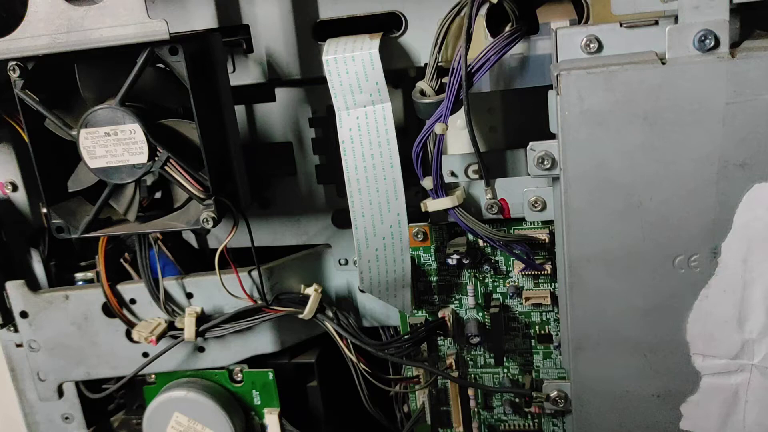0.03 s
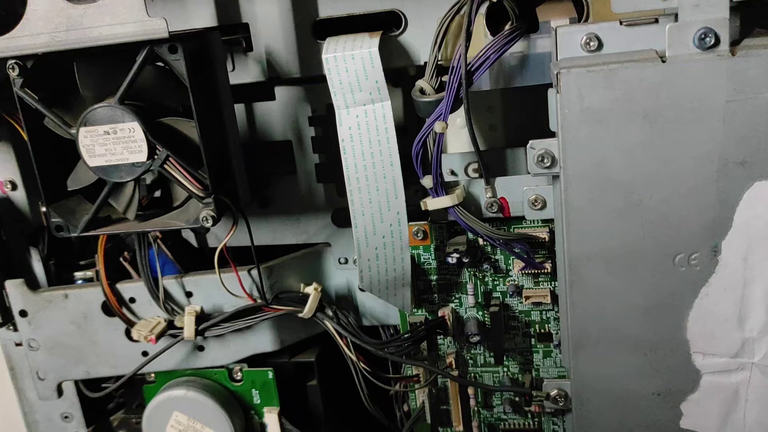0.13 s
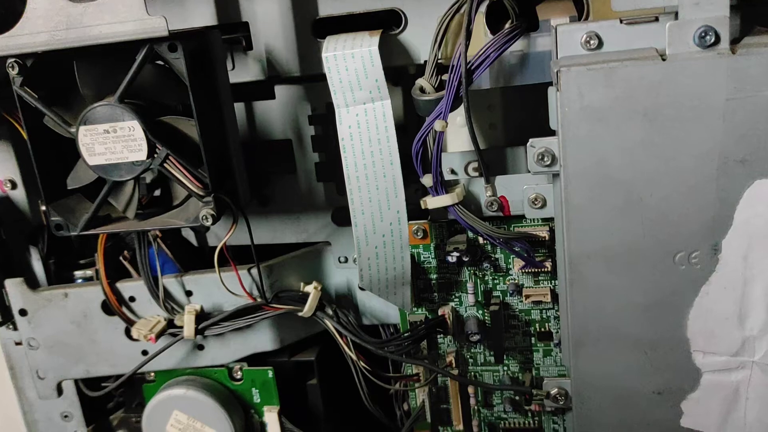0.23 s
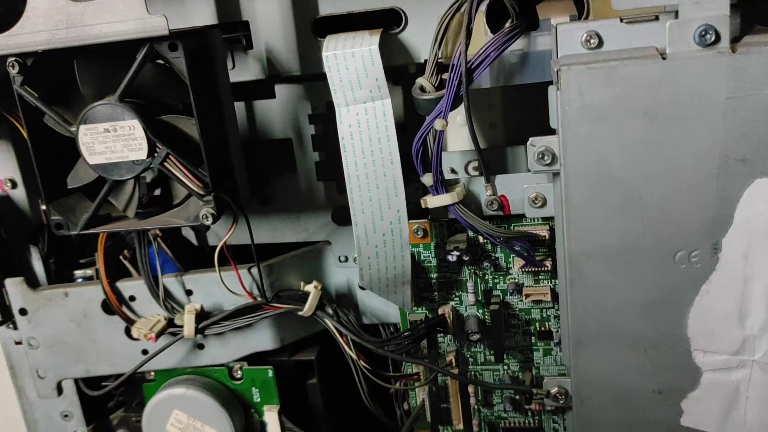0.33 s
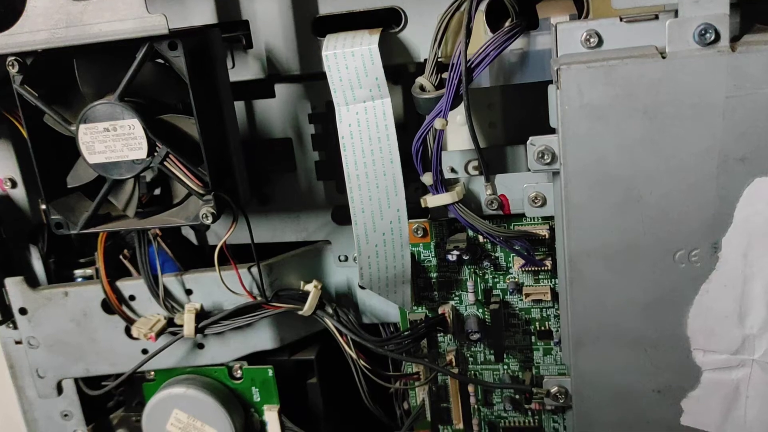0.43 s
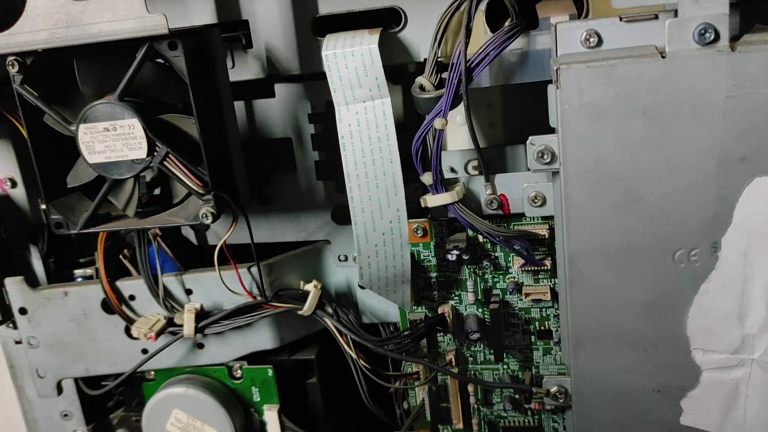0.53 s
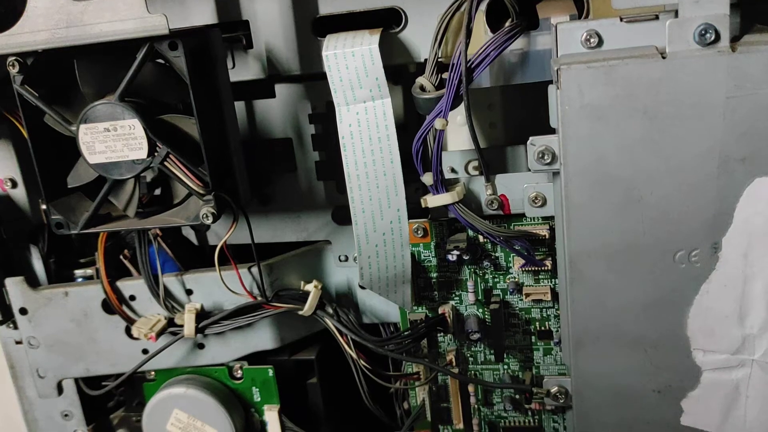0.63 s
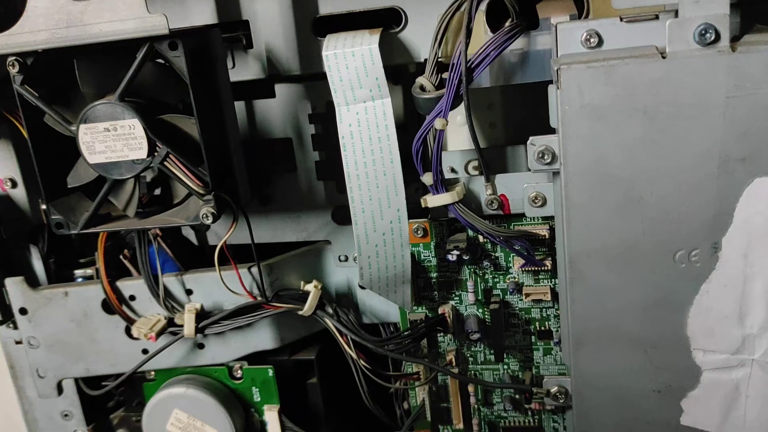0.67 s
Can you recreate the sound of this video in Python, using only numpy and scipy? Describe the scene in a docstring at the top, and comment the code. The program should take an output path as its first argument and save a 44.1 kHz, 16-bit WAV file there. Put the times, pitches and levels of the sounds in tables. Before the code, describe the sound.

A sharp, bright latch clack at about 0.5 seconds, several contacts in quick succession, rings thin sheet metal and a short room tail. Silence opens the first 0.1 seconds, then low fan hiss and faint scuffs. Small ticks and knocks scatter from 0.7 to 1.5. Around 1.7 to 1.9 a grainy, hissy slide along a panel swells and ends in soft low thumps. Close, uneven stereo, quiet indoors.

```python
"""Inside an open office machine in a quiet room, picked up close by two unlike microphone ports.
A fan lies low under the hiss: coloured noise. Parts scuff and tick, then something slides along a panel:
grainy noise bands. Small knocks and the thumps that end the slide are damped modes. Before the slide a latch
snaps with a sharp clack: noise bursts, a ringing sheet-metal frame and a room tail.
The recorder wakes up late and its offset swells, falls in steps and settles."""
import sys
import numpy as np
from scipy import signal
from scipy.fft import rfft, irfft, next_fast_len
from scipy.io import wavfile
from scipy.ndimage import uniform_filter1d, map_coordinates

SR = 44100
rng = np.random.default_rng(int(sys.argv[2]) if len(sys.argv) > 2 else 0)


def magnitude_from_level(level_db):
    """Linear magnitude for a level in decibels (20 dB per decade)."""
    exponent = np.asarray(level_db, float) / 20
    return 10 ** exponent


def int16_out(signal):
    """Quantize to a 16-bit WAV file."""
    q = np.round(np.clip(np.atleast_2d(signal).T, -1, 1) * 32767)
    wavfile.write(sys.argv[1], SR, q.astype(np.int16))


N = 94815

# Colour of fan, room and ports together. Each row: frequency in Hz, relative density in dB.
HISS_COLOUR = [(18, -28), (30, -16), (47, -18), (66, -22), (152, -25.5), (209, -26.5), (362, -32),
               (435, -34), (662, -44), (1090, -38.5), (1940, -39), (4730, -43), (6830, -34.5), (9860, -44),
               (11200, -39), (14600, -54.5), (15800, -44)]
# Balance of the hiss between the ports. Each row: frequency in Hz, left over right in dB.
HISS_BALANCE = [(100, 4.5), (400, 18.5), (1300, 11), (2500, 5), (4200, -3), (5500, 5), (6600, -21.5),
                (7600, 2), (8700, -12), (10000, 3), (11200, -3.5), (15000, -5.5)]
# Likeness of the two ports. Each row: frequency in Hz, left-right correlation from -1 to 1.
PORT_LIKENESS = [(60, 0.44), (180, 0.73), (550, 0.7), (1650, -0.39), (4970, -0.37), (15000, 0.34)]
# How long the room rings. Each row: frequency in Hz, t60 in seconds.
ROOM_DECAY = [(150, 0.95), (500, 0.9), (1200, 0.71), (2500, 0.57), (5000, 0.43), (8000, 0.37),
              (12000, 0.29)]

# Scuffs and ticks of parts. Each row: start in seconds, rise in seconds, t60 after the rise in seconds,
# treble level in dB, middle level in dB.
SCUFFS = [(0.183, 0.021, .15, -55.5, -62), (0.298, 0.037, 0.11, -58, -56.5), (0.452, 0.03, 0.23, -59, -61),
          (0.726, 0.0059, 0.15, -60, -68), (.766, 0.0087, 0.0834, -52, -59),
          (0.813, 0.0035, 0.11, -57, -58.5), (1.0829, 0.0011, .05, -55, -69.5),
          (1.124, 0.0013, 0.033, -50.5, -58), (1.139, 0.013, 0.17, -62, -67), (1.179, .003, 0.12, -78, -64),
          (1.313, 0.016, 0.12, -58, -62), (1.409, 0.0014, 0.0733, -55, -62),
          (1.43, 0.00184, 0.22, -63.5, -69), (1.477, 0.00255, 0.038, -59, -65),
          (1.491, 0.00093, 0.044, -53, -60.5), (1.507, 0.0021, 0.16, -65, -61),
          (1.791, 0.0022, 0.023, -53, -76), (2.068, 0.058, 0.163, -62, -62)]
# Course of the slide along the panel. Each row: time in seconds, treble, middle and panel level in dB.
SLIDE_COURSE = [(1.64, -76, -75.5, -71), (1.652, -72.5, -70.5, -65), (1.726, -52, -59.5, -54.5),
                (1.754, -49.5, -61, -56.5), (1.798, -42, -54.5, -53.5), (1.808, -46.5, -55, -57),
                (1.846, -41, -55, -48.5), (1.858, -45, -48.5, -47.5), (1.88, -51, -58, -59.5),
                (1.964, -69.5, -71, -73), (2.02, -73.5, -88, -68.5)]
# Colours of the four rubbing bands. Each row: frequency in Hz, relative density in dB.
TREBLE_COLOUR = [(2940, -73), (5000, -16), (5970, -6), (6740, -6), (7280, 2), (8250, 2), (9300, -4.5),
                 (10100, -26.5), (14000, -25.5), (15800, -44)]
MIDDLE_COLOUR = [(470, -12.5), (800, -6.5), (1150, -8.5), (1230, -19), (1350, -6.5), (1490, -6.5),
                 (1900, -6), (3500, -14.5), (4550, -65), (7700, -120)]
PANEL_COLOUR = [(35, -60), (60, -15), (136, -13.5), (204, -11.5), (317, -3), (389, -7), (436, -11),
                (522, -6.5), (694, -10.5), (900, -22.5), (1170, -69), (1980, -120)]
SQUEAK_COLOUR = [(2180, -24), (3700, -24), (3790, -1), (4050, 1.5), (5000, -9), (6500, -55), (11000, -120)]
# Balance of the rubbing. Each row: frequency in Hz, left over right in dB.
RUB_BALANCE = [(100, -8.5), (400, 2), (1300, 4), (2500, 13.5), (4200, -10.5), (5500, -18), (6600, -4),
               (7500, -14.5), (8700, 15), (10000, 8.5), (12000, 5), (15000, -5)]

# Small pitched knocks in the housing. Each row: time in seconds, centre frequency in Hz,
# relative level in dB, t60 in seconds.
KNOCKS = [(0.814, 1480, -58, 0.027), (0.826, 2580, -52, 0.031), (1.185, 880, -52.5, 0.018),
          (1.411, 2320, -38, 0.012), (1.511, 2037, -54, 0.0594)]
# Soft blows on the panel. Each row: time in seconds, level in dB.
THUMPS = [(1.80, -52), (1.826, -43), (1.840, -40), (1.854, -39)]
# Modes of the panel. Each row: frequency in Hz, level over the blow in dB, t60 in seconds.
PANEL_MODES = [(304, 0, .07), (335, -2, .07), (377, -2, .06), (503, -3, .06), (588, -10, .05)]

# Contacts of the latch. Each row: time in seconds, relative level in dB.
LATCH_CONTACTS = [(.4911, -29), (.4924, -23), (.4943, -28), (.4972, -31), (.4990, -33), (.5053, -34)]
# Colour of the contact noise. Each row: frequency in Hz, relative density in dB.
SNAP_COLOUR = [(120, -18.5), (200, -21), (334, -13), (393, -16), (774, -19), (929, -16.5), (1550, -15.5),
               (2360, -15.5), (3340, -22), (4010, -25), (7600, -14), (8960, -14), (10400, -33.5),
               (14200, -38.5), (15800, -71)]
# Balance of the contact noise. Each row: frequency in Hz, left over right in dB.
SNAP_BALANCE = [(300, 5), (1300, 5.5), (2600, 9), (4200, -3), (5500, -7.5), (6600, -11.5), (7500, -14.5),
                (8700, 9.5), (10000, 9), (12000, -2), (15000, 7)]
# Modes of latch and frame. Each row: nominal frequency in Hz, relative level in dB, t60 in seconds,
# left over right in dB.
FRAME_MODES = [(339, -18, 0.2, -2.5), (600, -13, 0.022, 1.5), (1150, -14.5, 0.038, 5),
               (1417, -19, 0.026, -6.5), (2680, -9, .015, 9), (3270, -15, .015, -6), (4500, -14, .012, -6),
               (7400, -1, .01, -8), (8650, 0, .009, 12), (12700, -18, 0.0053, 3),
               (14400, -28, 0.0085, 15.5)]

# Slow part of the recorder's offset. Each row: time in seconds, left, right as a part of full scale.
SLOW_OFFSET = [(.105, 0, 0), (.135, -.0015, .0004), (.15, .0066, .0035), (.166, .019, .0103),
               (.19, .0329, .0174), (.2258, .0519, .0271), (.2655, .0645, .0315), (.3255, .0767, .0342),
               (.36, .0755, .0328), (.4, .0653, .0272), (.45, .0554, .022), (.55, .0418, .0148),
               (.65, .0328, .0123), (.75, .0282, .0115), (.9, .0265, .0129), (1.1, .0282, .0141),
               (1.4, .028, .0155), (1.7, .0302, .0174), (2.15, .0325, .0179)]
# Sudden lasting falls of the offset. Each row: time in seconds, left, right as a part of full scale.
OFFSET_FALLS = [(.16605, .0052, .0028), (.22576, .0074, .0043), (.26549, .0105, .0049),
                (.32551, .0099, .0056)]


def unit(x):
    """Scaled to rms 1."""
    return x / np.sqrt(np.mean(x ** 2) + 1e-20)


def along(points, hz):
    """Values of a table of frequency points, joined by lines on a log frequency axis."""
    f, v = np.transpose(points)
    return np.interp(np.log(hz + 1), np.log(f + 1), v)


def curves(rows):
    """One value per sample for each column after the time."""
    seconds, *columns = np.transpose(rows)
    t = np.arange(N) / SR
    return np.array([np.interp(t, seconds, column) for column in columns])


def wobble(rate):
    """A smooth random curve through normal knots, rate knots a second."""
    knots = rng.standard_normal(int(N * rate / SR) + 4)
    return map_coordinates(knots, [np.arange(N) * rate / SR])


def filtered(x, response):
    """x with its spectrum multiplied by a response of frequency."""
    m = next_fast_len(N + SR // 2)
    return irfft(rfft(x, m) * response(np.fft.rfftfreq(m, 1 / SR)), m)[..., :N]


def ports(pair, colour, balance):
    """The two ports: unrelated signals mixed as mid and side to the likeness, then balanced by frequency."""
    def mid_side(hz):
        # cos^2 - sin^2 of half the angle is the correlation
        angle = np.arccos(np.clip(along(PORT_LIKENESS, hz), -1, 1)) / 2
        return magnitude_from_level(along(colour, hz)) * [np.cos(angle), np.sin(angle)]

    mid, side = filtered(pair, mid_side)
    left_right = np.array([mid + side, mid - side])
    return filtered(left_right, lambda hz: magnitude_from_level(np.outer([.5, -.5], along(balance, hz))))


def rush(colour, balance, patchy_db, grain_db):
    """Stereo noise with random patches in time and frequency and a fast grain; its middle has rms 1."""
    z = signal.stft(rng.standard_normal((2, N)), nperseg=256)[2]
    field = uniform_filter1d(rng.standard_normal(z.shape[1:]), size=5, axis=0)
    field = uniform_filter1d(field, size=6, axis=1)
    patchy = signal.istft(z * magnitude_from_level(patchy_db * unit(field)), nperseg=256)[1][:, :N]
    out = ports(patchy * magnitude_from_level(grain_db * wobble(300)), colour, balance)
    return out / np.std(out.mean(0))


def room(x):
    """Room tail: decaying noise in which each frequency dies at its own speed."""
    hz, t, z = signal.stft(rng.standard_normal((2, SR // 2)), SR, nperseg=256)
    decay = magnitude_from_level(-60 * t / along(ROOM_DECAY, hz)[:, None])
    tail = signal.istft(z * decay, SR, nperseg=256)[1]
    tail = tail / np.linalg.norm(tail[0])
    return signal.fftconvolve(x, tail, axes=1)[:, :N]


def add_mode(out, start_s, hz, db, t60, attack_s, balance_db):
    """Adds one damped mode: a sine that swells with a time constant and dies exponentially."""
    first = round(start_s * SR)
    t = np.arange(min(SR // 3, N - first)) / SR
    envelope = magnitude_from_level(db - 60 * t / t60) * (1 - np.exp(-t / attack_s))
    ring = envelope * np.sin(2 * np.pi * hz * t)
    out[:, first:][:, :len(t)] += np.outer(magnitude_from_level([balance_db / 2, -balance_db / 2]), ring)


def fan():
    """Low fan under the hiss of room and ports: coloured noise whose level wanders slowly."""
    level_db = -62.5 + 1.5 * wobble(3.52)
    return magnitude_from_level(level_db) * rush(HISS_COLOUR, HISS_BALANCE, patchy_db=-1.24, grain_db=2.4)


def scuffs():
    """Treble and middle gains of the scuffs and ticks: a straight rise, then an exponential decay."""
    gains, t = np.zeros((2, N)), np.arange(N) / SR
    for start, rise, t60, treble_db, middle_db in SCUFFS:
        since = np.clip(t - start, 0, None)
        shape = np.minimum(since / rise, 1) * magnitude_from_level(-60 * np.clip(since - rise, 0, None) / t60)
        gains += np.outer(magnitude_from_level([treble_db, middle_db]), shape)
    return gains


def rubbing():
    """Scuffs and the long slide as grainy friction noise in treble, middle, panel and a squeak."""
    treble, middle, panel = magnitude_from_level(curves(SLIDE_COURSE))
    scuff_treble, scuff_middle = scuffs()
    treble = treble + scuff_treble
    middle = middle + scuff_middle
    squeak = magnitude_from_level(-17) * treble  # narrow band near 4 kHz, under the treble
    out = treble * rush(TREBLE_COLOUR, RUB_BALANCE, patchy_db=1.5, grain_db=-0.5)
    out += middle * rush(MIDDLE_COLOUR, RUB_BALANCE, patchy_db=1.5, grain_db=0.0)
    out += panel * rush(PANEL_COLOUR, RUB_BALANCE, patchy_db=2.5, grain_db=2.4)
    out += squeak * rush(SQUEAK_COLOUR, RUB_BALANCE, patchy_db=2.5, grain_db=2.5)
    return out


def knocks():
    """Small knocks in the housing: each is a close cluster of nine short modes, with some room."""
    out = np.zeros((2, N))
    for start, hz, db, t60 in KNOCKS:
        for spread, late in rng.standard_normal((9, 2)):
            add_mode(out, start + .005 * abs(late), hz * (1 + .09 * spread), db - 6, t60, .001, 7)
    return out + magnitude_from_level(-12) * room(out)


def thumps():
    """Soft blows ring the damped modes of the panel, each mode up to 3 ms late, with some room."""
    out = np.zeros((2, N))
    for start, db in THUMPS:
        for hz, level, t60 in PANEL_MODES:
            add_mode(out, start + .003 * rng.random(), hz, db + level, t60, .005, 4)
    return out + magnitude_from_level(-12) * room(out)


def latch():
    """Quick contacts crack as noise bursts, ring the sheet-metal frame and fill the room."""
    crack, ring = np.zeros((2, N)), np.zeros((2, N))
    t = np.arange(SR // 2) / SR
    contact_t60 = .005  # seconds
    for start, db in LATCH_CONTACTS:
        burst = magnitude_from_level(db - 60 * t / contact_t60) * rng.standard_normal((2, len(t)))
        crack[:, round(start * SR):][:, :len(t)] += burst
        for hz, level, t60, balance_db in FRAME_MODES:
            detuned = hz * (1 + 0.016 * rng.normal())  # each contact rings it a little differently
            add_mode(ring, start, detuned, db + 1.5 + level, t60, .0004, balance_db)
    noise = magnitude_from_level(18.5) * ports(crack + magnitude_from_level(4.5) * room(crack), SNAP_COLOUR, SNAP_BALANCE)
    return noise + ring + magnitude_from_level(-17) * room(ring)


def scene():
    """All sources, from the background to the latch."""
    return fan() + rubbing() + knocks() + thumps() + latch()


def top_cut(x):
    """Nothing passes above the cut-off."""
    return signal.sosfilt(signal.butter(12, 16460, fs=SR, output="sos"), x)


def record(dry):
    """Silent until the recorder wakes and fades in; its offset swells, falls in steps and settles."""
    t = np.arange(N) / SR
    wake_s, wake_gain, full_fade_s = 0.1, 0.11, 0.028  # full_fade_s: a rise from 0 to 1
    fade = (t > wake_s) * np.clip(wake_gain + (t - wake_s) / full_fade_s, 0, 1)
    falls = sum(np.outer(fall, t > start) for start, *fall in OFFSET_FALLS)
    offset = uniform_filter1d(curves(SLOW_OFFSET), size=600) - falls
    return top_cut(dry * fade + offset * (fade > 0))


dry = scene()
out = record(dry)
int16_out(out)
```